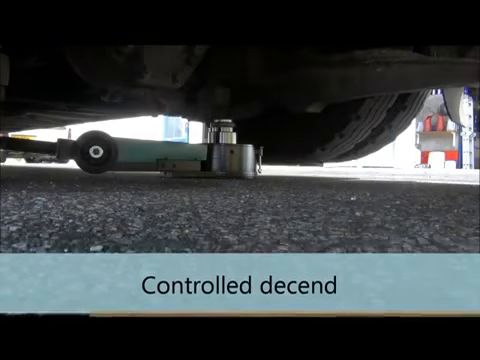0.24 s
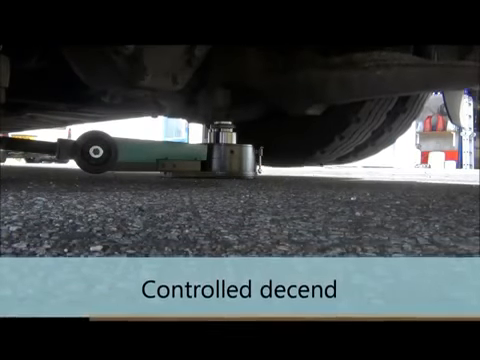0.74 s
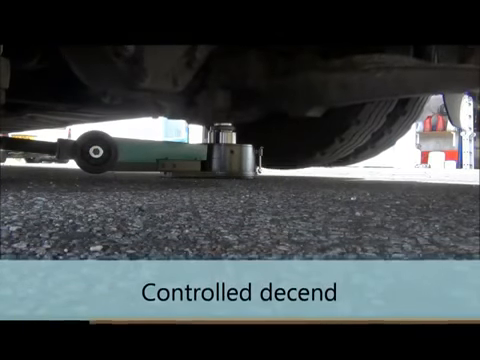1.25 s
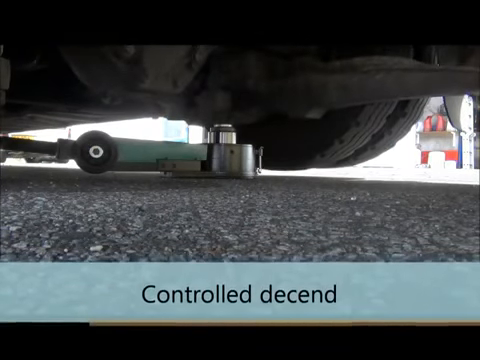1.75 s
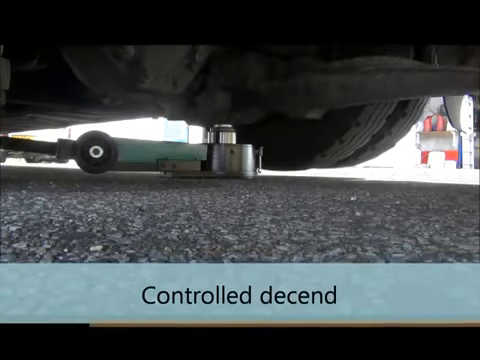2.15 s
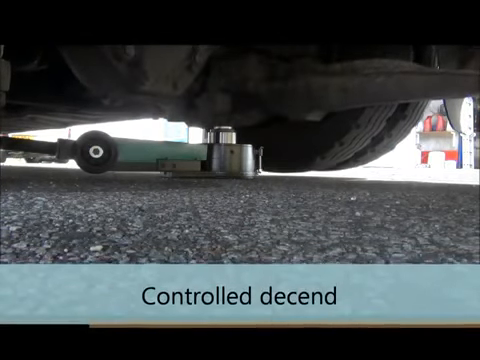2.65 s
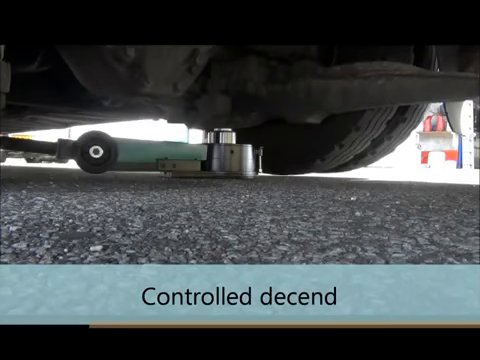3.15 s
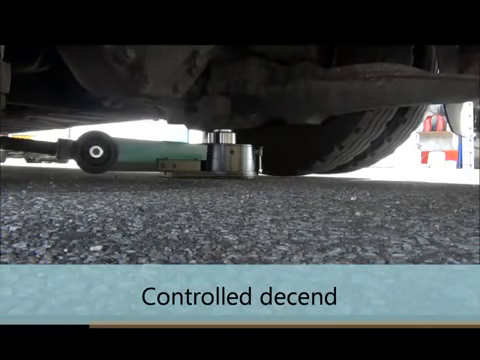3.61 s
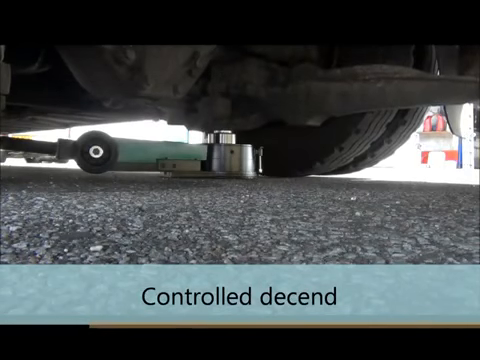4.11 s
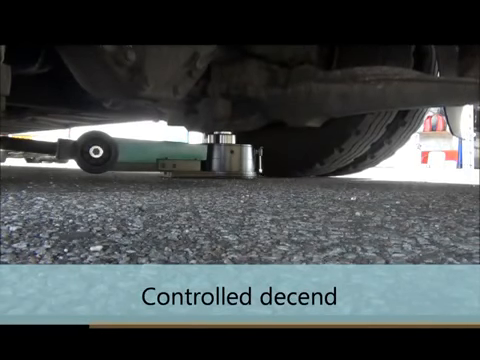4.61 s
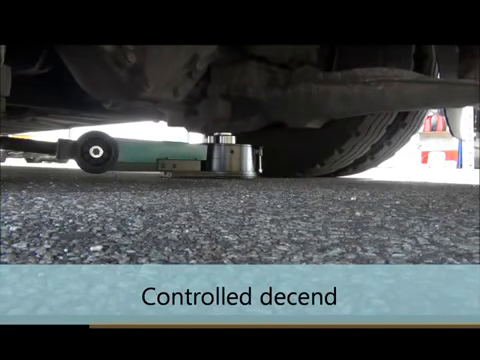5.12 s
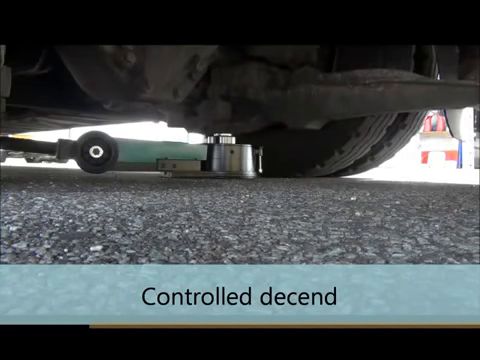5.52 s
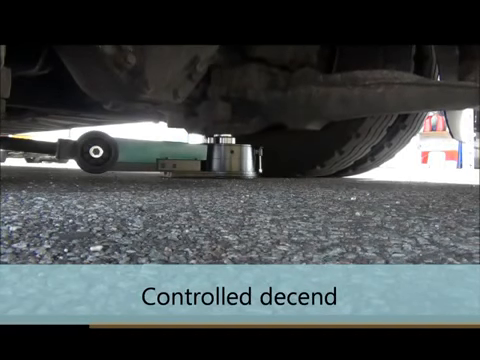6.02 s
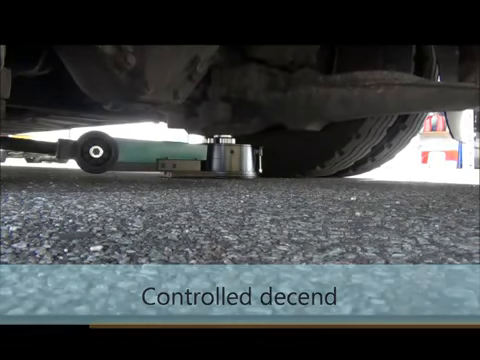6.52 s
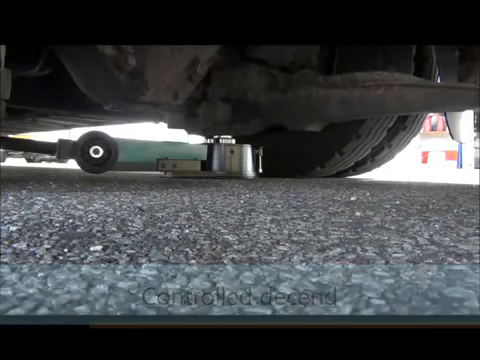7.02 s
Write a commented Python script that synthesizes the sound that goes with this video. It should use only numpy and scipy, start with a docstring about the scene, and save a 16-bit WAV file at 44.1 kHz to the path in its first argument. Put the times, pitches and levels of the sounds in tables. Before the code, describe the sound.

Bright pressurised air hiss from a jack, cut off briefly, reopening with a puff, then coarser with metallic ringing, growing whistle and low rumble.

```python
"""An air-hydraulic jack lets a heavy vehicle down, heard from the ground under the chassis.
Its release valve hisses as a turbulent jet excites resonances; it is shut for a moment and opens again with a puff.
Then the flow turns coarse and rings the steel body and pipe, and a whistle grows in the valve block.
The sinking load rumbles and groans as filtered noise, and a few low sine tones come and go.
The workshop hums behind as steady, wider noise with faint tonal bands."""
import sys
import numpy as np
from scipy import signal
from scipy.fft import rfft, irfft, next_fast_len
from scipy.io import wavfile
from scipy.ndimage import map_coordinates

SR = 44100
rng = np.random.default_rng(int(sys.argv[2]) if len(sys.argv) > 2 else 0)


def wav_record(signal):
    """Record a signal, one row per channel, as 16-bit PCM in the file named by sys.argv[1]."""
    frames = np.transpose(np.atleast_2d(signal))
    bounded = np.clip(frames, -1, 1)
    # unit amplitude maps onto the largest positive 16-bit level
    quanta = np.round(bounded * 32767).astype(np.int16)
    wavfile.write(sys.argv[1], SR, quanta)


N = 320166

# the valve shuts and reopens; later the flow turns coarse and the load sinks in earnest [s]
SHUT_S, REOPEN_S, COARSE_S = 1.7494, 2.21, 3.103


def amp(db):
    """Level to amplitude: 20 dB is a factor of ten."""
    return 10 ** (np.asarray(db) / 20)


def unit(x):
    """Normalisation to an rms value of 1."""
    return x / np.sqrt(np.mean(x ** 2) + 1e-20)


def clock():
    """Sampled time: the instant of each sample in seconds."""
    return np.arange(N) / SR


def curves(rows):
    """Linear interpolation in time: one curve for each column after the time."""
    s, *columns = np.transpose(rows)
    return [np.interp(clock(), s, column) for column in columns]


def wobble(rate):
    """Band-limited fluctuation: a smooth curve through random knots, rate of them a second."""
    knots = rng.standard_normal(int(N * rate / SR) + 4)
    return map_coordinates(knots, [np.arange(N) * rate / SR])


def gate(start, length, edge_s):
    """Trapezoidal envelope: a linear rise from 0 to 1, a hold and a linear release."""
    inside = np.minimum(clock() - start, start + length - clock())
    return np.clip(.5 + inside / edge_s, 0, 1)


def bell(peak, half_width):
    """Gaussian envelope: a smooth swell up to 1, down to 1/e at the half width."""
    return np.exp(-((clock() - peak) / half_width) ** 2)


def filtered(x, response):
    """Linear filtering: the spectrum of x times a response of frequency."""
    m = next_fast_len(N + SR // 2)
    spectrum = rfft(x, m) * response(np.fft.rfftfreq(m, 1 / SR))
    return irfft(spectrum, m)[..., :N]


def slope(points):
    """Spectral envelope: a response through (f/Hz, level/dB) points on a log frequency axis."""
    f, db = np.transpose(points)
    return lambda hz: amp(np.interp(np.log(hz + 1), np.log(f), db))


def resonances(modes, order=1):
    """Superposition of independently driven modes: powers add; a higher order steepens the skirts."""
    def response(hz):
        power = 0
        for centre, width, db in modes:
            detuning = (centre * centre - hz * hz) / (hz * width + 1e-9)
            power = power + amp(db) ** 2 / (1 + detuning ** 2) ** order
        return np.sqrt(power)
    return response


def noise(response, width=None):
    """Partial coherence: coloured stereo noise of rms 1 whose side part sets how far the channels differ."""
    if width is None:
        # side minus mid level of the noise, almost mono around 3 kHz: f/Hz, level/dB
        width = [(60, -14), (200, -22), (400, -16), (700, -11.5), (1200, -24.5), (3000, -79), (6000, -31.5),
                 (10000, -14), (14000, -10)]
    mid, side = filtered(rng.standard_normal((2, N)), response)
    side = filtered(side, slope(width))
    return unit(np.array([mid + side, mid - side]))


def tone(hz, db, waver_hz, flutter_db):
    """Frequency and amplitude modulation: a sine of about the given rms level, unsteady in both."""
    level = amp(db + flutter_db * wobble(12))
    phase = 2 * np.pi * np.cumsum(hz + waver_hz * wobble(12)) / SR
    return np.sqrt(2) * level * np.sin(phase)


def notes(rows, edge_s, waver_hz, flutter_db):
    """Superposition of separate unsteady tones, each with a soft start and end."""
    return sum(gate(start, length, edge_s) * tone(hz, db, waver_hz, flutter_db)
               for start, length, hz, db in rows)


def workshop():
    """Diffuse background: steady broadband noise with faint tonal bands, wide in the treble."""
    # smooth spectrum of the air: f/Hz, relative level/dB
    air_spectrum = [(25, 0), (75, 9), (150, 9), (300, -1.5), (500, -6.5), (1000, 3), (2000, -2.5),
                    (3500, -5), (5800, -7.5), (9500, -3), (12000, -4), (15000, -14)]
    # faint tones in the air: f/Hz, width/Hz, relative level/dB
    air_tones = [(517, 10, 6.5), (810, 40, -8), (1630, 30, 10)]

    def air(hz):
        return np.hypot(slope(air_spectrum)(hz), resonances(air_tones)(hz))
    return amp(-64.5) * noise(air, width=[(80, -28), (500, -27), (3000, -25), (10000, -4.5)])


def rumble():
    """Structure-borne noise: the load settling on the ram gives low random vibration."""
    # load settling on the ram: t/s, relative level/dB
    load = [(0.0, -78), (0.3, -85), (2.24, -63.5), (2.47, -73.5), (3.07, -67.5), (3.39, -57.5),
            (3.78, -60.5), (4.25, -57), (5.24, -55), (5.74, -55), (7.26, -62)]
    # smooth spectrum of the rumble: f/Hz, relative level/dB
    rumble_spectrum = [(20, -28), (45, -5), (75, -5.5), (130, -2.5), (220, -1), (350, -3), (500, -8.5),
                       (700, -7), (1200, -19), (3000, -36)]
    load_db, = curves(load)
    return amp(load_db + 2.5 + 1.2 * wobble(7.2)) * noise(slope(rumble_spectrum))


def groan():
    """Resonant response: the shifting weight swells in two low bands of noise."""
    # groans as the weight shifts: peak t/s, half width/s, level/dB
    groans = [(4.249, 0.42, -55), (5.8, 0.28, -57)]
    swells = sum(amp(db) * bell(peak, half_width) for peak, half_width, db in groans)
    return swells * noise(resonances([(214, 32, -1), (258, 45, 0)], order=2))


def drone():
    """Musical interval: a low tone creeps up, joined by one at 3/4 of its frequency once the load sinks."""
    # pitch of the drone: t/s, f/Hz
    drone_pitch = [(0, 85), (1.3, 92), (3.6, 102), (4.8, 102.5), (5.5, 106.5), (6.4, 105.5), (7.2, 102.5)]
    # strength of the drone: t/s, relative level/dB
    drone_level = [(0.0, -87), (0.6, -70), (0.71, -80), (1.52, -63), (1.64, -70), (1.78, -56), (3.07, -78),
                   (3.26, -62), (4.1, -53.5), (4.49, -67), (4.55, -55), (4.85, -47), (5.44, -58),
                   (5.84, -51.5), (6.63, -58.5), (7.14, -69), (7.18, -54), (7.26, -63)]
    drone_hz, = curves(drone_pitch)
    drone_db, = curves(drone_level)
    upper = tone(drone_hz, drone_db - 1.1, waver_hz=0.82, flutter_db=1.1)
    # exponential approach with a time constant of 0.85 s
    settling = 1 - np.exp(-np.maximum(clock() - COARSE_S, 0) / 0.85)
    undertone = settling * tone(drone_hz * 3 / 4, -62.5, waver_hz=2.1, flutter_db=1.5)
    return upper + undertone


def hums_and_singing():
    """Quasi-sinusoidal tones: brief low hums and a thin singing tone that comes and goes."""
    # brief low hums: start t/s, length/s, f/Hz, level/dB
    hums = [(.31, .4, 124, -64), (1.59, 0.18, 125.5, -61.5), (2.25, 1.4, 132, -72.5)]
    # thin singing tone: start t/s, length/s, f/Hz, level/dB
    sings = [(.2, 0.47, 375, -71.5), (.85, 0.54, 380, -71.5), (2.35, 1, 391, -70.5),
             (3.18, 0.25, 396, -53.5)]
    humming = notes(hums, edge_s=.06, waver_hz=0.81, flutter_db=0.0)
    singing = notes(sings, edge_s=.13, waver_hz=3.58, flutter_db=1.2)
    return humming + singing


def underbody(x, t60, echo_db, count=5):
    """Reverberation: dense short echoes between ground and chassis, in a pattern that keeps shifting."""
    t = np.arange(SR // 4) / SR
    decay = amp(-60 * t / t60) * (t > .002)
    tails = rng.standard_normal((count, 1, len(t))) * decay
    shares = np.array([wobble(4) for _ in tails])
    shares /= np.linalg.norm(shares, axis=0)
    echoes = 0
    for share, tail in zip(shares, tails):
        response = tail / np.linalg.norm(tail)
        echoes = echoes + share * signal.oaconvolve(x, response, axes=1)[:, :N]
    return x + amp(echo_db) * filtered(echoes, slope([(4000, 1.2), (10000, 0.5)]))


def ram_travel():
    """Change of geometry: the share by which resonances lean from ram-up to ram-down levels."""
    # travel of the ram: t/s, share sunk (0-1)
    travel = [(0, 0.15), (3.08, 0.06), (3.25, 0.42), (4.4, 0.64), (5.6, 0.85)]
    return np.clip(curves(travel)[0], 0, 1)


def turbulence(calm_db, surge_db, coarse_db, rise_s, growth_db_per_s):
    """Flow-driven level in dB: up in each surge, a step up when the flow turns coarse, then slow growth."""
    # surges while the valve is being moved: start t/s, length/s, strength (0-1)
    surges = [(1.555, 0.34, 1), (2.202, 0.15, 0.55)]
    surge = sum(strength * gate(start, length, edge_s=0.05) for start, length, strength in surges)
    sinking_s = np.maximum(clock() - COARSE_S, 0)
    coarse = 1 - np.exp(-sinking_s / rise_s)
    return calm_db + surge_db * surge + coarse_db * coarse + growth_db_per_s * sinking_s


def ringing(modes, surge_db):
    """Modal excitation: steel modes, each driven in its own surges, shift in balance as the ram sinks."""
    sunk = ram_travel()
    gains, rings = [], []
    for hz, width, up_db, down_db in modes:
        gains.append(np.sqrt(width) * amp(up_db + sunk * (down_db - up_db)))
        rings.append(amp(surge_db * wobble(22)) * noise(resonances([(hz, width, 0)], order=2)))
    mixed = sum(gain * ring for gain, ring in zip(gains, rings))
    return unit(mixed / np.linalg.norm(gains, axis=0))


def body():
    """Forced vibration: turbulence churns in the jack and keeps its steel body ringing."""
    # modes of the body: f/Hz, width/Hz, relative level/dB with ram up, with ram down
    body_modes = [(731, 77, -1.5, -7.5), (1022, 55, 1, -0.5), (1210, 88, -3.5, -6.5), (1408, 46, -3.5, -3),
                  (1569, 57, 3, 4), (1845, 84, 3.5, -1)]
    # smooth spectrum of the churning: f/Hz, relative level/dB
    churn_spectrum = [(150, -17.5), (400, 0.5), (550, -6.5), (900, -7), (1300, 1.5), (2000, 5.5),
                      (3000, -7.5), (6000, -15)]
    body_db = turbulence(calm_db=-57.0, surge_db=5.0, coarse_db=8.5, rise_s=0.043, growth_db_per_s=0.99)
    churn = amp(-4.5 + 1.4 * wobble(25)) * noise(slope(churn_spectrum))
    return amp(body_db) * (ringing(body_modes, surge_db=1.9) + churn)


def pipe():
    """Forced vibration: the flow drives the modes of the pipe, which swell twice."""
    # modes of the pipe: f/Hz, width/Hz, relative level/dB with ram up, with ram down
    pipe_modes = [(2240, 58, -0.55, 2), (2439, 47, 1.2, -9.5), (2727, 54, 2.2, -3), (2966, 52, -1.1, -0.5)]
    # the pipe catches the flow and rings out: peak t/s, half width/s, rise in level/dB
    pipe_swells = [(.4, 0.61, 7.5), (1.75, 0.03, 9.5)]
    pipe_db = turbulence(calm_db=-58, surge_db=4.5, coarse_db=7.0, rise_s=0.16, growth_db_per_s=0.85)
    swell_db = sum(db * bell(peak, half_width) for peak, half_width, db in pipe_swells)
    return amp(pipe_db + swell_db) * ringing(pipe_modes, surge_db=2.0)


def whistle():
    """Narrow-band resonance: the valve block whistles near 4 kHz, growing 12 dB/s up to 5.6 s."""
    whistle_db = -51.5 - 12 * np.maximum(5.6 - clock(), 0)
    return amp(whistle_db + 1.5 * wobble(16)) * noise(resonances([(4000, 62, -2), (4080, 32, 0)], order=2))


def jet(modes, spectrum, order):
    """Jet noise: turbulence in resonances whose balance shifts, by a power crossfade, as the ram sinks."""
    sunk = ram_travel()
    centre, width, up_db, down_db = np.transpose(modes)

    def coloured(db):
        peaks = resonances(list(zip(centre, width, db)), order)
        return noise(lambda hz: np.hypot(slope(spectrum)(hz), peaks(hz)))
    return np.sqrt(1 - sunk) * coloured(up_db) + np.sqrt(sunk) * coloured(down_db)


def sizzle():
    """Jet noise at small scale: the flow sizzles in the narrow nozzle, high in frequency."""
    # resonances of the nozzle: f/Hz, width/Hz, relative level/dB with ram up, with ram down
    nozzle_modes = [(8280, 210, -3, -3), (8535, 230, -3, 3.5), (8760, 120, -21, -2), (9310, 170, 4, 3.5),
                    (9510, 170, 2.5, -1.5), (9820, 240, 2, 1), (9920, 150, 1, -1), (10170, 270, -0.5, -1),
                    (10440, 220, 2.5, 3), (10570, 160, 0.5, 2.5), (10650, 120, -3, -3), (10930, 260, 2, 2),
                    (11170, 120, -4.5, 3.5), (11900, 210, -17, -1), (12500, 160, -16, -1),
                    (13200, 200, -1, -18), (13960, 200, -5, -7), (14800, 220, -22, -11)]
    # smooth spectrum of the sizzle: f/Hz, relative level/dB
    sizzle_spectrum = [(5000, -42), (7800, -16), (8800, -4), (10500, -1), (11200, -6), (11700, -9),
                       (13500, -13.5), (15000, -16.5)]
    # strength before and after the pause: t/s, relative level/dB
    before_pause = [(0.03, -38.5), (0.932, -36.5), (0.994, -38), (1.262, -36),
                    (1.558, -36), (1.578, -36.5), (1.672, -37.5), (1.72, -37)]
    after_pause = [(2.24, -36), (3.1, -36.5), (3.17, -41), (3.22, -38.5),
                   (4.49, -38), (5.79, -39), (7.21, -37.5), (7.22, -38.5)]
    sizzle_db, = curves([*before_pause, *after_pause])
    return amp(sizzle_db + 3.1 + .2 * wobble(35)) * jet(nozzle_modes, sizzle_spectrum, order=2)


def rush():
    """Jet noise at larger scale: the flow rushes through the valve block and excites its resonances."""
    # resonances of the valve block: f/Hz, width/Hz, relative level/dB with ram up, with ram down
    block_modes = [(3600, 67, -18.0, -9), (4055, 43, 0, 1.5), (4300, 23, 3.5, -18), (4470, 220.0, -5, -5.5),
                   (4870, 115.0, -7, -6.5), (5326, 210, -2, -5), (5576, 34, -1, 2), (5910, 110, -4, -6),
                   (6340, 126, -5.5, -4), (6640, 42, -11, -3), (6870, 54, 1, -1), (7045, 43, 3.5, -10),
                   (7420, 72, -4, -1), (7790, 180, -1, -6.5)]
    # smooth spectrum of the rush: f/Hz, relative level/dB
    rush_spectrum = [(200, -29), (900, -42.5), (1500, -19.5), (2000, -11.5), (3100, -8.5), (3600, -9.5),
                     (4400, -9), (6000, -18.5), (7800, -14), (10000, -16)]
    rush_db = turbulence(calm_db=-42.5, surge_db=2.0, coarse_db=2.5, rise_s=.08, growth_db_per_s=.35)
    unsteady_db = 0.4 * wobble(4.5) + 0.41 * wobble(30)
    return amp(rush_db + unsteady_db) * jet(block_modes, rush_spectrum, order=1)


def puff():
    """Pressure release: pent-up air gives a short, full burst of noise as the valve snaps open."""
    colour = slope([(900, -27), (1800, 0), (4500, -3), (7500, -9), (12000, -25)])
    return amp(-47) * gate(REOPEN_S, 0.095, edge_s=.01) * noise(colour)


def valve(fall_db_per_s):
    """Flow control: a gain in dB, 0 when open, falling steadily to a leak once shut, then snapping open."""
    closing = -fall_db_per_s * (clock() - SHUT_S)
    opening = 3400 * (clock() - REOPEN_S)  # dB, at 3400 dB/s
    return np.clip(np.maximum(closing, opening), -39.5, 0)


def release():
    """Source and resonator: the valve feeds a fluttering flow, and the steel dies away slower than the hiss."""
    flutter = amp(0.26 * wobble(24) + 0.38 * wobble(110))
    hiss = amp(valve(fall_db_per_s=302)) * (sizzle() + rush() + puff())
    steel = amp(valve(fall_db_per_s=190)) * (body() + pipe() + whistle())
    return underbody(flutter * (hiss + steel), t60=0.16, echo_db=-13.0)


def scene():
    """Superposition: the jack close by, over the steady, wider air of the workshop."""
    low_sounds = rumble() + groan() + drone() + hums_and_singing()
    return workshop() + low_sounds + release()


def record(dry):
    """Band limitation: nothing passes at or above 15050 Hz."""
    return filtered(dry, lambda hz: hz < 15050)


dry = scene()
out = record(dry)
wav_record(out)
```